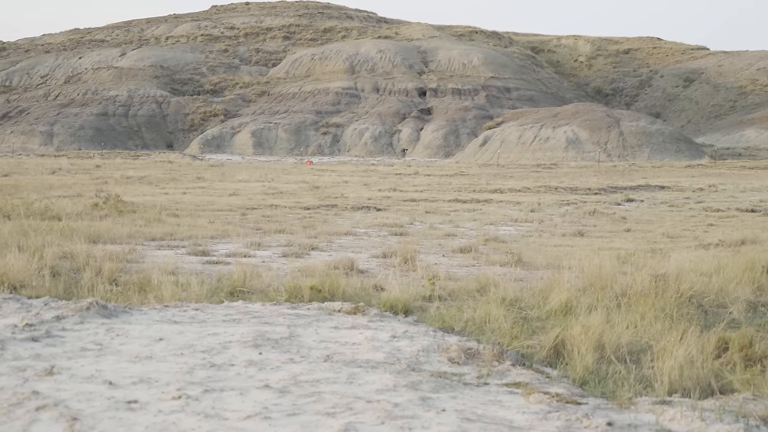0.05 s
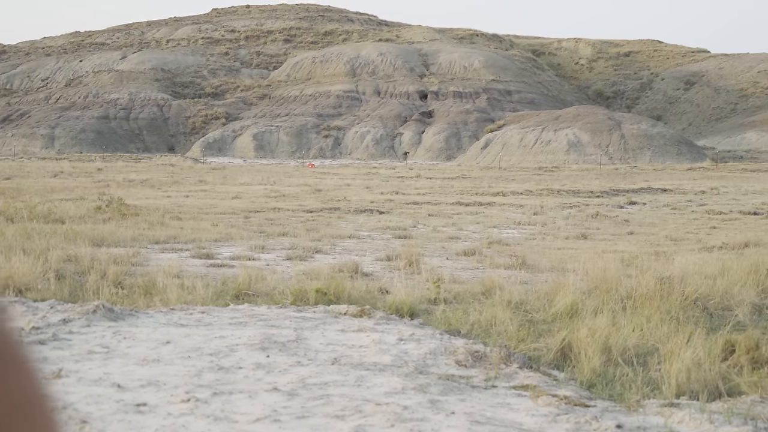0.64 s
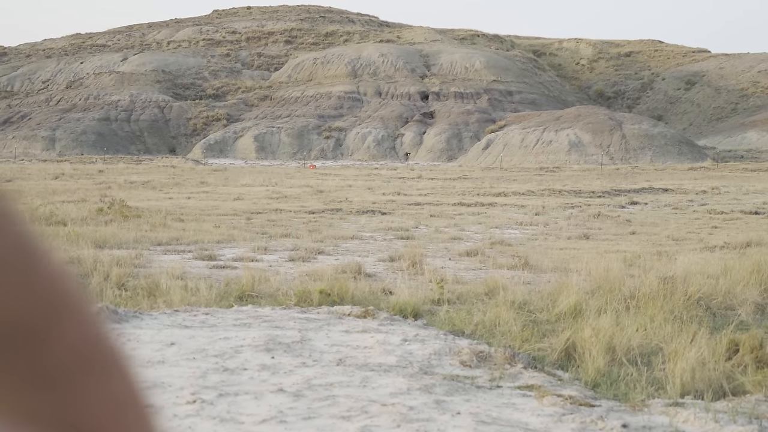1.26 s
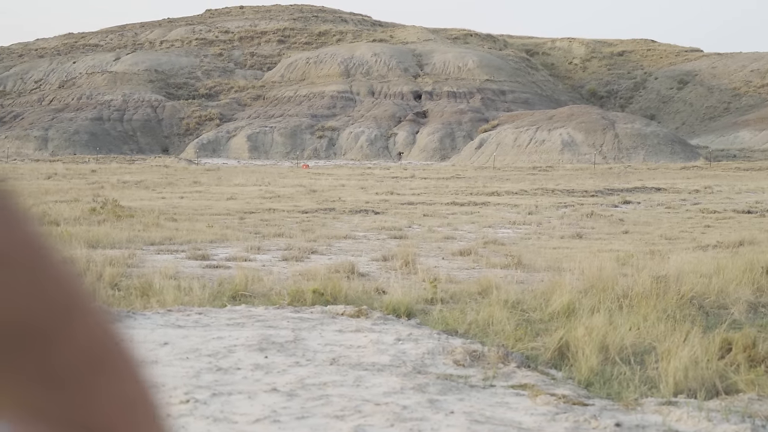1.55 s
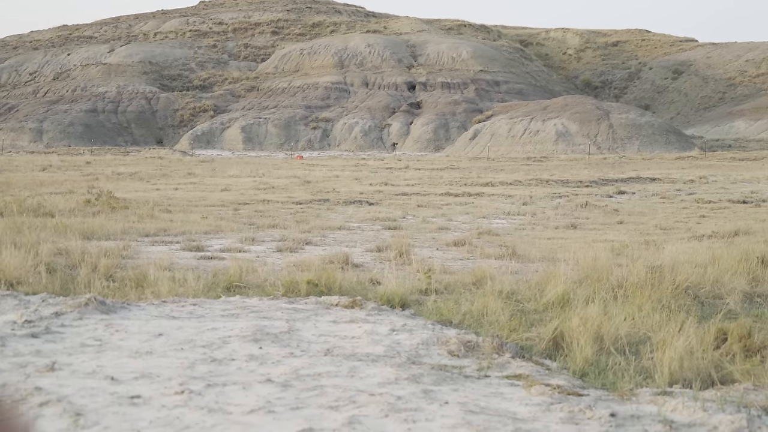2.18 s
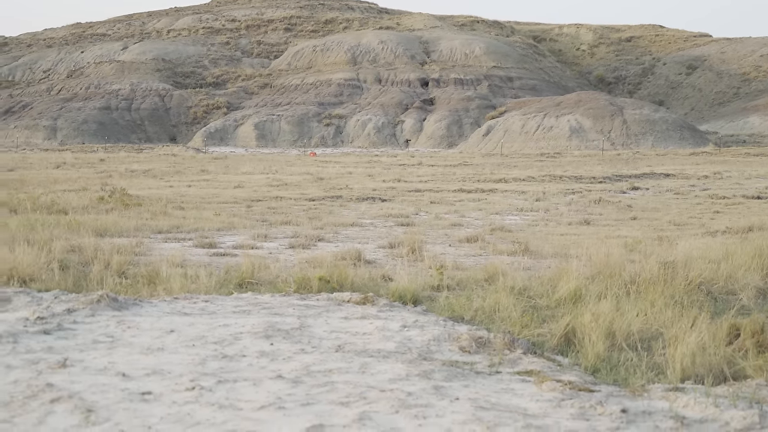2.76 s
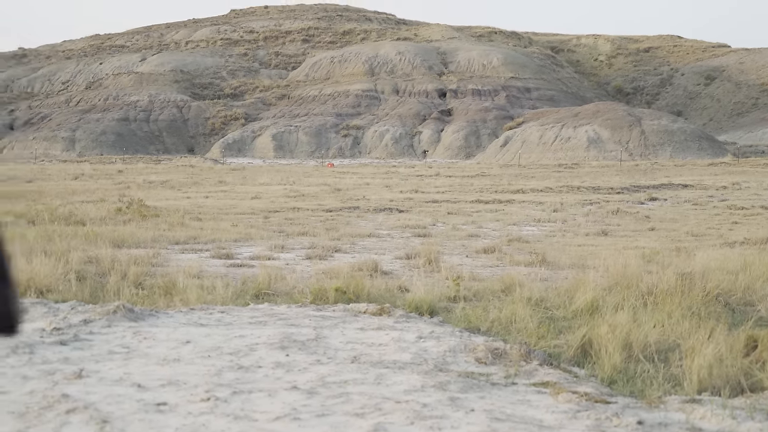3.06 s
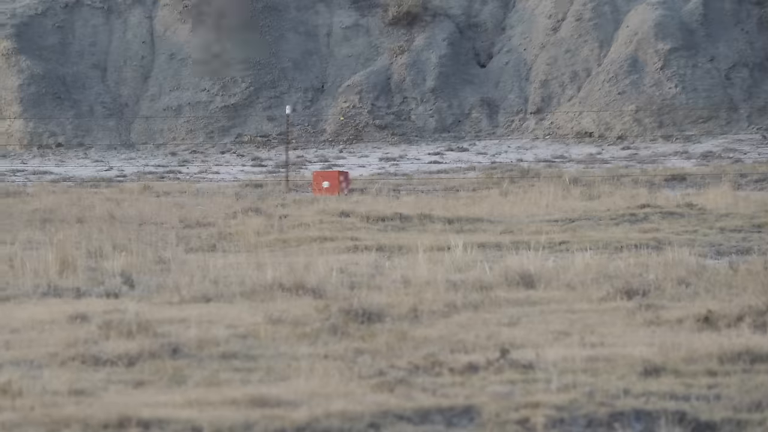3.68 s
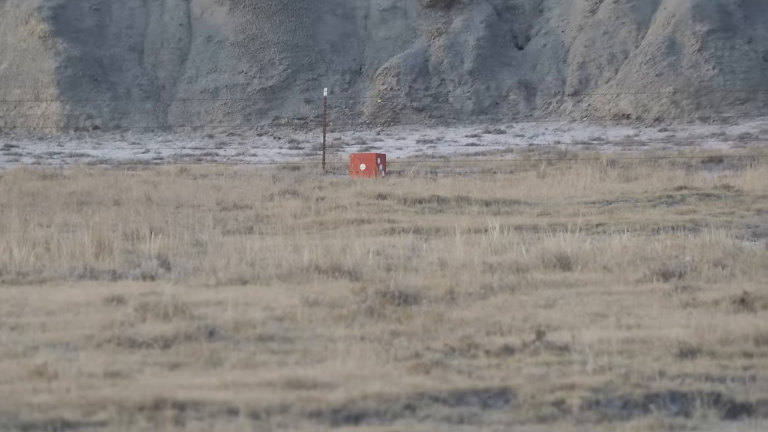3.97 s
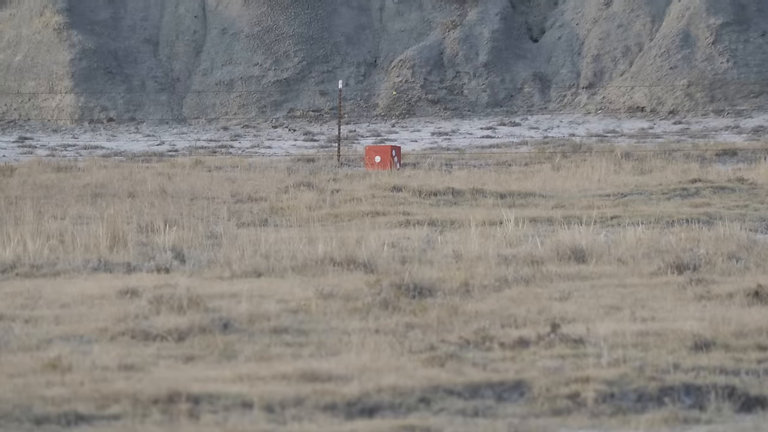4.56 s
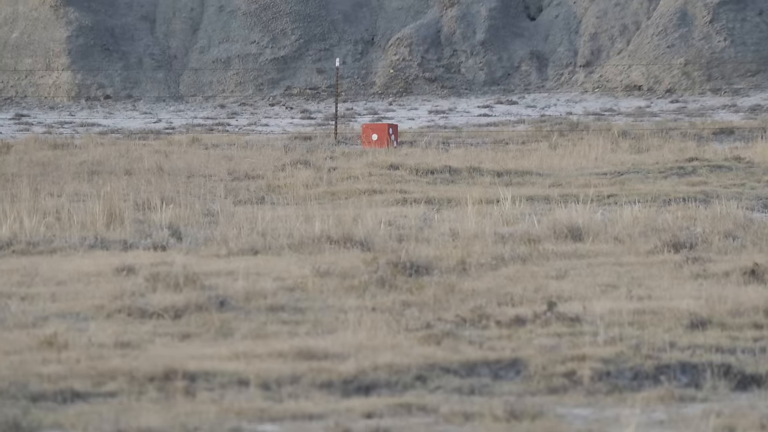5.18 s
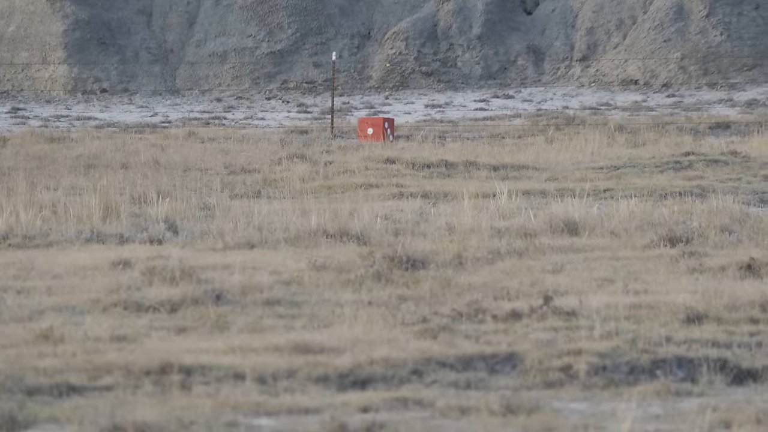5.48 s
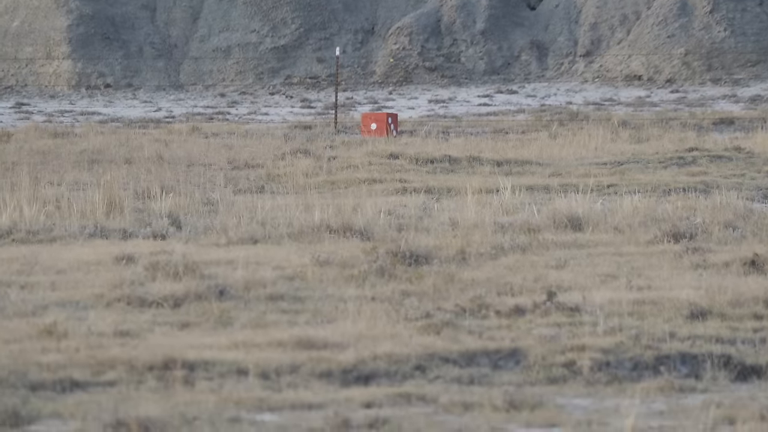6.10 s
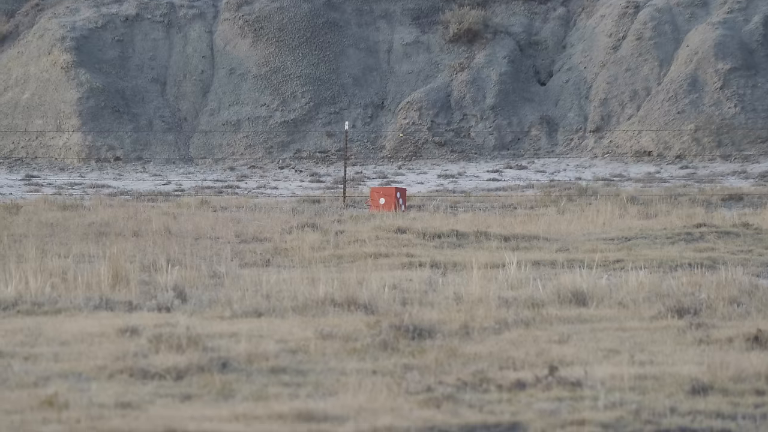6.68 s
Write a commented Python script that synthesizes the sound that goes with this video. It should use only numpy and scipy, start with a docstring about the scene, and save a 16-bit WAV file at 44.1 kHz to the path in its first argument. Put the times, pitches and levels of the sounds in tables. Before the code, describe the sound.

A compound bow fires twice up close with sharp snaps, amid jacket rustle and metallic clinks, over faint crickets and wind on the microphone.

```python
"""A compound bow is shot twice, right beside the microphone, on open grassland.
The release snaps, the string zips home against its stop and the limbs shudder as the arrow leaves.
Arrow and fittings clink and the hand knocks on the grip; a jacket rustles through each draw.
Behind the archer crickets chirp, dry grass ticks and wind buffets the microphone."""
import sys
import numpy as np
from scipy.fft import rfft, irfft, next_fast_len
from scipy.io import wavfile
from scipy.ndimage import map_coordinates

SR = 44100
rng = np.random.default_rng(int(sys.argv[2]) if len(sys.argv) > 2 else 0)


def file_out(sig):
    """Save sig as 16-bit WAV at sys.argv[1]."""
    # one column per channel
    cols = np.atleast_2d(sig).T
    # limit, then scale
    lim = np.clip(cols, -1, 1)
    pcm = np.round(lim * 32767).astype(np.int16)
    wavfile.write(sys.argv[1], SR, pcm)


N = 306054

# Shots: release_s, stop_s, level_db
SHOTS = [(4.167, 4.193, -1), (6.6456, 6.6708, -1)]
# Release hook modes: freq_hz, level_db, t60_s
HOOK_MODES = [(3124, -2, 0.0095), (3398, -4.5, 0.0042), (3992, -9, .0085), (5500, -15, .015),
              (6790, -20, 0.019), (7503, -6, 0.013), (9330, -15, 0.022), (12200, -17, 0.015)]
def release(snap_db=3, rebound_db=2, rebound_s=0.0033, crack_db=3, crack_t60_s=0.0057):
    """The release hook flies open and hits its end stop a moment later."""
    out, t = np.zeros(N), clock()[:SR // 8]
    for release_s, _, level_db in SHOTS:
        for delay_s, blow_db in ((0, snap_db), (rebound_s, rebound_db)):
            crack = amp(crack_db - 60 * t / crack_t60_s) * rng.standard_normal(len(t))
            add(out, release_s + delay_s, amp(level_db + blow_db) * (ring(HOOK_MODES, t) + crack))
    return out


ZIP_RISE_S, ZIP_HOLD_S, ZIP_FALL_S = 0.0034, 0.0044, 0.0016
def string_zip(gain_db=-1, stop_hz=4350, climb_octaves_per_s=190, rough_rad=0.55):
    """The string drives the arrow ever faster: a rough tone climbs into the stop."""
    out, t = np.zeros(N), clock()[:SR // 40] - 1 / 60  # t = 0 at the stop
    pitch_hz = stop_hz * 2 ** (climb_octaves_per_s * np.minimum(t, ZIP_FALL_S))
    shape = envelope(t + ZIP_HOLD_S - ZIP_FALL_S / 2, ZIP_RISE_S, ZIP_HOLD_S, ZIP_FALL_S)
    for _, stop_s, level_db in SHOTS:
        tone = np.sin(2 * np.pi * np.cumsum(pitch_hz) / SR + rough_rad * wobble(1830)[:len(t)])
        add(out, stop_s + t[0], amp(level_db + gain_db) * shape * tone)
    return out


# String stop crack: freq_hz, density_db
CRACK_SPECTRUM = [(60, 10), (250, 9), (700, 6.5), (2000, -3), (4500, 2), (8000, 7), (10500, 1.5),
                  (14000, 4), (16000, -9)]
# Riser and limb modes: freq_hz, level_db, t60_s
RISER_MODES = [(1310, -11, 0.096), (1490, -4, 0.12), (1700, -10, 0.19), (2080, -8, 0.054),
               (1000, -7, 0.088)]
def string_stop(crack_db=2, crack_t60_s=0.024, swell_s=0.0012, riser_db=-13):
    """The string slams home and rings the riser."""
    out, t = np.zeros(N), clock()[:SR // 4]
    attack = 1 - np.exp(-t / swell_s)
    for _, stop_s, level_db in SHOTS:
        crack = amp(crack_db - 60 * t / crack_t60_s) * noise(CRACK_SPECTRUM)[:len(t)]
        riser = amp(riser_db) * ring(RISER_MODES, t)
        add(out, stop_s - swell_s, amp(level_db) * attack * (crack + riser))
    return out


# Limb and cable resonances: centre_hz, width_hz, level_db
LIMB_RESONANCES = [(178, 38, -5), (311, 28, 0.5), (454, 30, 0.5), (646, 140, -4.5), (1440, 840, -17.5)]
# Fletching hiss: freq_hz, density_db
FLETCHING_SPECTRUM = [(500, -10), (1400, 1), (2300, -0.5), (3500, 1), (6000, -2.5), (8300, -1),
                      (10200, -8.5), (11800, -7), (14000, -12), (16000, -15)]
def follow_through(shudder_db=-18, rush_db=-23, launch_db=-14, swing_hz=68, swing_depth=0.22):
    """The arrow hisses off the rest; limbs and cables shudder while the fletching rushes away."""
    out = np.zeros(N)
    for release_s, stop_s, level_db in SHOTS:
        t = clock(release_s)
        shudder = amp(shudder_db) * envelope(t - 0.077, rise_s=0.078, hold_s=0.017, fall_s=0.11)
        rush = amp(rush_db) * envelope(t - 0.084, rise_s=0.044, hold_s=0.007, fall_s=0.14)
        launch = amp(launch_db) * envelope(clock(stop_s - ZIP_HOLD_S), 0.016, 0, 0.048)
        string_swing = 1 + swing_depth * np.cos(2 * np.pi * swing_hz * t)
        travel = np.clip(t / (stop_s - release_s), 0, 1)
        limbs = shudder * string_swing * resonant_noise(LIMB_RESONANCES)
        arrow = np.hypot(rush, launch) * noise(FLETCHING_SPECTRUM, grain_db=14)
        out += amp(level_db) * travel * (limbs + arrow)
    return out


# Metal contacts of arrow and fittings: start_s, level_db, low_band_db, high_band_db, length_ratio
CLINKS = [(2.609, -0.5, -7.5, -4.5, .55), (3.427, -12.5, -29, -18, .55), (3.443, -7, -8, -10, .75),
          (4.332, -13, 1, -4, 0.39), (4.354, -19.5, 0, -1, 0.78), (4.614, -30, 2, -9, 0.38),
          (4.655, -18, -7, -9, .6), (4.664, -14.5, -3, -7, 0.55), (4.681, -23, 7, -5, .4),
          (4.686, -15.5, 1.5, -1, .5), (4.709, -26, -6, -6, .5), (4.716, -17.5, -3, -6, 0.56),
          (4.7866, -8.5, -2.5, -6, .25), (4.7989, -11, 4, -6, 0.27), (4.868, -24.5, -6, -6, 0.61),
          (4.893, -27, -3, -5, .4), (4.96, -34, -16, -18, 0.27), (4.999, -22.5, -5, -7, .6),
          (5.0239, -1, -4, 1, 0.71), (5.03, -7.5, -14, 2, 0.46), (5.073, -11.5, -7, -7, .5),
          (5.091, -25, -10, -10, 0.58), (5.123, -20.5, -6, -6, 0.79), (5.2001, -4.5, 1.5, -3, .8),
          (6.2255, -12, -2.5, -8, 0.83), (6.348, -23.5, -3, -10, .6), (6.81, -16.5, 3, -2.5, 0.76),
          (6.837, -20, 0, 0, .6), (6.846, -24, -5, 2, .5), (6.874, -3.5, 9.5, -4.5, .55),
          (6.882, -22, -5, 6, .4), (6.888, -17, 8, -5, .4)]
# Fitting modes: freq_hz, level_db, t60_s
FITTING_MODES = [(2975, -6.5, 0.029), (3945, -16, 0.1), (5480, -7, 0.059), (6730, -10.5, 0.046),
                 (7350, -8, 0.065), (7820, -7.5, 0.033), (8710, -1.5, 0.044), (9180, -1, 0.021),
                 (9300, -17.5, 0.14), (10150, -13, .04), (11760, -9.5, .03), (12500, -2.5, 0.027),
                 (13100, -14, 0.017), (13920, -1.5, 0.025)]
def clinks(gain_db=1, crack_db=1, crack_t60_s=0.043, bounce_s=0.003, bounce_db=-6, detune=0.012):
    """Each contact strikes three times; the grip damps and detunes the fittings anew."""
    out, t = np.zeros(N), clock()[:SR // 8]
    colour_hz = [500, 2200, 2900, 5700, 7000, 9400, 10800]
    for start_s, level_db, low_db, high_db, length_ratio in CLINKS:
        modes = [(hz * rng.normal(1, detune), db, t60 * length_ratio) for hz, db, t60 in FITTING_MODES]
        hit = amp(crack_db - 60 * t / (crack_t60_s * length_ratio)) * rng.standard_normal(len(t))
        for k in range(3):
            lag = round(k * bounce_s * length_ratio * rng.uniform(0.56, 2) * SR)
            hit[lag:] += amp(k * bounce_db) * ring(modes, t, scatter_db=3.5)[:len(t) - lag]
        colour_db = [low_db - 14, low_db - 9, low_db, low_db, 0, 0, high_db]
        hit = filtered(hit, lambda hz: amp(np.interp(hz, colour_hz, colour_db)))
        add(out, start_s, amp(level_db + gain_db) * hit / np.abs(hit).max())
    return out


# Hand knocks on the bow: start_s, level_db, pitch_hz, slap_db
KNOCKS = [(3.197, -20, 201.4, -10), (3.358, -1.5, 740, -5), (3.373, -2, 219.3, 3), (4.692, -30, 357, 5),
          (4.829, -11, 574, -2.5), (4.835, -25, 350, 15), (4.984, -23, 356, 6), (4.992, -22.5, 331, -6),
          (5.5308, -3, 530, 15), (5.5363, -15, 256, -15), (5.731, -19, 449, -3), (6.274, -17, 602, 4.5),
          (6.307, -16, 505, 3), (6.344, -13.5, 850, -6)]
def knocks(grip_t60_s=0.0092, slap_t60_s=0.0019, slap_hz=1250, rub_db=-19, rub_t60_s=0.036):
    """The hand gives one quick push and rubs briefly; the damped grip swings a few cycles."""
    out, t = np.zeros(N), clock()[:SR // 10]
    friction = noise(FOLD_SPECTRUM)
    for k, (start_s, level_db, pitch_hz, slap_db) in enumerate(KNOCKS):
        slap = amp(slap_db - 60 * t / slap_t60_s) * np.sin(2 * np.pi * slap_hz * t)
        hit = slap + amp(-60 * t / grip_t60_s) * np.sin(2 * np.pi * pitch_hz * t)
        rub = amp(rub_db - 60 * t / rub_t60_s) * friction[k * len(t):][:len(t)]
        add(out, start_s, amp(level_db) * (hit / np.abs(hit).max() + rub))
    return out


# Jacket slides: start_s, hold_s, rise_s, fall_s, fold_db, swish_db, hollow_hz, pocket_re_fold_db
SLIDES = [(2.067, .15, 0.39, .2, -43.5, -50, 750, -0.5), (2.27, 0.067, 0.22, 0.13, -39.5, -45, 780, -0.5),
          (2.396, .045, 0.026, 0.11, -32.5, -34.5, 752, 0), (2.545, .19, .075, 0.045, -26, -28, 1000, -3),
          (2.776, 0.32, 0.14, 0.056, -37.5, -37.5, 1000, -20),
          (2.893, 0.082, 0.16, 0.2, -25, -30.5, 862, -20), (3.15, 0.034, .13, 0.021, -26, -32.5, 1000, -33),
          (3.274, 0.067, 0.12, 0.12, -21, -26.5, 1148, -20),
          (5.35, .125, .02, 0.069, -36.5, -40, 1000, -23), (5.56, .04, 0.065, 0.077, -43.5, -50, 699, -12),
          (5.697, 0.0596, 0.13, .12, -33.5, -37.5, 713.6, -18),
          (5.86, 0.014, 0.069, .16, -29, -33, 795, -14), (5.989, 0.085, 0.13, .2, -31.5, -32.5, 798, -9),
          (6.199, 0.11, 0.21, 0.067, -35.5, -37.5, 790, -12)]
# Quick sleeve brushes: centre_s, fold_db, scrape_db, sigma_s
BRUSHES = [(2.572, -32.5, -28.5, 0.044), (2.726, -25.5, -25.5, 0.0073), (2.962, -30, -27.5, 0.019),
           (3.169, -32, -26.5, 0.014), (3.282, -40, -23, 0.016), (3.334, -23.5, -24, 0.014),
           (4.447, -44.5, -53, 0.0067), (4.692, -43, -44, .0073), (4.722, -63, -46, 0.15),
           (5.096, -50, -46, 0.13), (5.294, -40, -66, 0.0055), (5.341, -30.5, -43, 0.0013),
           (5.39, -33, -36.5, 0.0083), (5.454, -29.5, -37, 0.0073), (5.734, -20, -29, 0.0087),
           (6.072, -30, -26, .015), (6.31, -29.5, -45, 0.0072)]
# Flapping folds: freq_hz, density_db
FOLD_SPECTRUM = [(80, -18), (170, -5), (300, 1), (400, -2.5), (600, 3.5), (950, 2.5), (1400, -1.5),
                 (2000, -8), (4000, -51.5), (9000, -66)]
# Sliding weave: freq_hz, density_db
SWISH_SPECTRUM = [(600, -16), (1700, 4.5), (3000, -0.5), (4200, 0), (6000, -0.5), (8600, 0), (10500, -10.5),
                  (12000, -11.5), (14500, -8), (16000, -26)]
# Fast, brighter scrape: freq_hz, density_db
SCRAPE_SPECTRUM = [(600, -5), (1700, 2), (3200, 2.5), (5000, 1), (8500, 6), (10300, -3.5), (11800, -7),
                   (14500, -3), (16000, -18)]
def jacket(fold_gain_db=-2, hollow_db=-2, crease_db=-5, rasp_db=-6, rasp_hz=2850, pocket_hz=360):
    """Cloth slides on cloth: folds flap around a hollow, creases pop, the weave rasps and catches."""
    fold, swish, pocket, flap, scrape = np.zeros((5, N))
    for start_s, hold_s, rise_s, fall_s, fold_db, swish_db, _, pocket_db in SLIDES:
        slide = envelope(clock(start_s), rise_s, hold_s, fall_s)
        fold = np.hypot(fold, amp(fold_gain_db + fold_db) * slide)
        swish = np.hypot(swish, amp(swish_db) * slide)
        pocket = np.hypot(pocket, amp(fold_gain_db + fold_db + pocket_db) * slide)
    for centre_s, fold_db, scrape_db, sigma_s in BRUSHES:
        stroke = np.exp(-0.5 * np.linspace(-4, 4, round(8 * sigma_s * SR)) ** 2)
        start_s = centre_s - len(stroke) / SR / 2
        add(flap, start_s, amp(fold_db) * stroke)
        add(scrape, start_s, amp(scrape_db) * stroke)
    starts_s, holds_s, *_, hollows_hz, _ = np.transpose(SLIDES)
    hollow_hz = np.interp(clock(), starts_s + holds_s / 2, hollows_hz) * np.exp(0.13 * wobble(18))
    pressure = (fold / fold.max()) ** 0.5  # harder rubbing brings out the hollow
    hollow = amp(hollow_db) * pressure * band(hollow_hz, width_hz=400)
    rasp = amp(rasp_db) * band(rasp_hz * np.exp(0.15 * wobble(16)), width_hz=900)
    cloth = noise(FOLD_SPECTRUM, grain_db=8) + hollow + amp(crease_db) * creases()
    folds = np.hypot(fold, flap) * cloth
    folds += pocket * band(pocket_hz * np.exp(0.13 * wobble(12)), width_hz=280)
    weave = swish * (noise(SWISH_SPECTRUM, grain_db=7.5) + rasp)
    weave += scrape * noise(SCRAPE_SPECTRUM, grain_db=11.5)
    catching = amp(1.32 * wobble(110))
    return catching * (folds + weave)


def creases(rate_per_s=170, centre_hz=1000, log_spread=0.6, t60_cycles=16):
    """Small creases buckle at random, each a short hollow pop; rms 1."""
    when, pitch, strength = rng.random((round(rate_per_s * N / SR), 3)).T[:, :, None]
    pitch_hz = centre_hz * np.exp(log_spread * np.sqrt(3) * (2 * pitch - 1))
    samples = np.arange(600)
    cycles = pitch_hz * samples / SR
    pops = -np.log(1 - strength) * np.sin(2 * np.pi * cycles) * amp(-60 * cycles / t60_cycles)
    positions = (when * N).astype(int) + samples
    return unit(np.bincount(positions.ravel(), pops.ravel(), N)[:N])


# Arm scuffs: start_s, hold_s, level_db
SCUFFS = [(3.365, 0.033, -20.5), (3.408, 0.068, -26), (6.273, 0.13, -43.5)]
# Hollow scuff resonances: centre_hz, width_hz, level_db
SCUFF_RESONANCES = [(162, 52, 0), (285, 82, -1), (600, 125, -8.5), (810, 106, -2.5), (1310, 170, -26)]
def scuff(rise_s=0.0094, fall_s=0.023):
    """The arm settles at full draw with a dull, hollow rub."""
    rubbing = sum(amp(level_db) * envelope(clock(start_s), rise_s, hold_s, fall_s)
                  for start_s, hold_s, level_db in SCUFFS)
    return rubbing * resonant_noise(SCUFF_RESONANCES)


# Squeak resonances: centre_hz, width_hz, level_db
SQUEAK_RESONANCES = [(1410, 240, -12), (2644, 390, -11), (4020, 250, 0), (8000, 980, -21), (9490, 500, -20),
                     (13400, 600, -23)]
def squeak(start_s=1.887, gain_db=-24.5, start_hz=1010, end_hz=1390, glide_s=0.0043, rise_s=0.0025):
    """Stick-slip speeds up, and its overtones sweep through the resonances."""
    out, t = np.zeros(N), clock(2 * rise_s)[:SR // 25]
    slip_hz = end_hz + (start_hz - end_hz) * np.exp(-(np.maximum(t, 0) / glide_s) ** 2)
    harmonics = np.arange(1, 12)[:, None]
    partials = np.exp(2j * np.pi * harmonics * np.cumsum(slip_hz) / SR)
    tone = np.sum(body(SQUEAK_RESONANCES, harmonics * slip_hz) * partials, axis=0).real
    add(out, start_s + t[0], amp(gain_db) * envelope(t, rise_s, hold_s=0.0053, fall_s=0.019) * tone)
    return out


SYLLABLE_S, SYLLABLE_PERIOD_S = 0.035, 0.05
# Nearest cricket's chirps: first_syllable_s, level_db, syllable_count
CHIRPS = [(.021, -41, 3), (.239, -44, 3), (.556, -38, 3), (1.025, -38, 3), (1.433, -38.5, 3),
          (1.680, -46.5, 4), (1.94, -36.5, 3), (3.418, -38, 3), (3.865, -37.5, 3), (4.295, -37.5, 3),
          (4.5, -47, 3), (4.972, -40, 2), (5.375, -37, 3), (5.918, -37, 2), (6.431, -41, 4)]
def near_cricket(pitch_hz=4790, first_db=-4):
    """A cricket chirps in short groups of wing strokes, the first one softer."""
    out = np.zeros(N)
    for first_s, level_db, syllable_count in CHIRPS:
        for k in range(round(syllable_count)):
            stroke = syllable(pitch_hz * rng.normal(1, 0.0094), SYLLABLE_S * rng.uniform(0.73, 1.19))
            gain = amp(level_db + first_db * (k == 0) + rng.normal())
            add(out, first_s + k * SYLLABLE_PERIOD_S - SYLLABLE_S / 2, gain * stroke)
    return out


# Higher trills: start_s, end_s, pitch_hz, level_db
TRILLS = [(1.4, 3, 7200, -59), (2.6, 6.94, 7330, -51.5), (.08, 1.9, 6650, -58), (.02, 1.1, 8450, -59),
          (1.6, 2.5, 8700, -66)]
def trilling_crickets(period_s=0.0787):
    """Other crickets stroke their wings in long, even runs."""
    out = np.zeros(N)
    for start_s, end_s, pitch_hz, level_db in TRILLS:
        stroke = syllable(pitch_hz, SYLLABLE_S, droop=0.078)
        for centre_s in np.arange(start_s, end_s, period_s):
            add(out, centre_s - SYLLABLE_S / 2, amp(level_db + rng.normal()) * stroke)
    return out


def far_crickets(level_db=-52, pitch_hz=4730, period_s=0.39, count=3):
    """Far neighbours take turns with four-stroke chirps, each at its own pitch and pace."""
    out = np.zeros(N)
    for neighbour, (pitch, pace) in enumerate(rng.uniform(-1.1, 1, (count, 2))):
        stroke = syllable(pitch_hz * (1 + 0.0287 * pitch), SYLLABLE_S)
        for start_s in np.arange(neighbour / count * period_s, N / SR, period_s * (1 + 0.022 * pace)):
            for k, stroke_db in enumerate(rng.normal(level_db, 2.5, 4)):
                add(out, start_s + k * SYLLABLE_PERIOD_S, amp(stroke_db) * stroke)
    return out


def syllable(pitch_hz, length_s, droop=0.122):
    """One wing stroke: the file slows, so the tone sags."""
    progress = np.arange(round(length_s * SR)) / (length_s * SR)
    phase = 2 * np.pi * np.cumsum(pitch_hz * (1 - droop * progress ** 2)) / SR
    return np.sin(np.pi * progress) ** 2 * np.sin(phase)


# Gusts on the microphone: start_s, hold_s, buffet_db, flutter_db
GUSTS = [(1.633, 0.057, -23.5, -47), (2.567, 0.022, -24, -35), (2.746, 0.61, -24.5, -48),
         (3.277, 0.21, -17.5, -36.5), (3.786, 0.057, -12, -31), (4.065, 0.21, -18.5, -35),
         (4.43, 0.14, -13, -33.5), (4.636, 0.24, -16.5, -35.5), (4.966, 0.084, -38, -41),
         (5.285, 0.023, -32, -41), (6.29, 0.19, -17.5, -31.5), (6.532, .06, -16, -29),
         (6.75, 0.24, -21, -28.5)]
# Slow eddies: freq_hz, density_db
BUFFET_SPECTRUM = [(3, -6), (10, 3), (20, -1), (33, -10), (52, -13.5), (80, -26.5), (160, -43), (400, -120)]
# Quicker flutter: freq_hz, density_db
FLUTTER_SPECTRUM = [(25, -41), (55, 0), (80, -3), (120, -5), (170, -12), (250, -20.5), (500, -37),
                    (2000, -74)]
# Open air: freq_hz, density_db
AIR_SPECTRUM = [(60, 7), (300, 3.5), (600, 1.5), (1000, -4), (2000, -7.5), (3700, -11), (5000, -6),
                (6200, -12.5), (10000, -14.5), (16000, -16)]
def wind(steady_buffet_db=-27, steady_flutter_db=-44, air_db=-50, grass_db=-50, grass_fall_s=0.74):
    """Gusts on a steady breeze buffet the microphone; a stir in the grass dies away."""
    buffet, flutter = amp(steady_buffet_db), amp(steady_flutter_db)
    for start_s, hold_s, buffet_db, flutter_db in GUSTS:
        gust = envelope(clock(start_s), rise_s=0.12, hold_s=hold_s, fall_s=0.25)
        buffet = np.hypot(buffet, amp(buffet_db) * gust)
        flutter = np.hypot(flutter, amp(flutter_db) * gust)
    air = amp(air_db + 0.11 * wobble(3.92)) * noise(AIR_SPECTRUM)
    grass = amp(grass_db - 20 * clock() / grass_fall_s) * noise(FOLD_SPECTRUM)
    return buffet * noise(BUFFET_SPECTRUM) + flutter * noise(FLUTTER_SPECTRUM) + air + grass


# Ticks in the grass: start_s, level_db
TICKS = [(0.1238, -31), (0.3627, -33), (1.0013, -26.5), (1.347, -35), (1.942, -33), (2.05, -30),
         (2.069, -28)]
# Dry stalks: freq_hz, density_db
STALK_SPECTRUM = [(400, 7), (1500, 1.5), (3500, -0.5), (6000, -10), (14000, -35)]
def grass_ticks(gain_db=-5, t60_s=0.022):
    """Dry stalks tick faintly."""
    bursts, t = np.zeros(N), clock()[:SR // 20]
    for start_s, level_db in TICKS:
        add(bursts, start_s, amp(level_db + gain_db - 60 * t / t60_s))
    return bursts * noise(STALK_SPECTRUM)


def insect_buzz(peak_s=0.41, level_db=-51.5, centre_hz=7900, width_hz=900):
    """A brief, thin, high buzz, as of an insect or bird."""
    shape = envelope(clock(peak_s), rise_s=0.016, hold_s=0, fall_s=0.3)
    return amp(level_db) * shape * resonant_noise([(centre_hz, width_hz, 0)])


def amp(db):
    """Decibels to gain."""
    return 10 ** (np.asarray(db) / 20)


def unit(x):
    """Scale to rms 1."""
    return x / np.sqrt(np.mean(x ** 2) + 1e-20)


def clock(start_s=0):
    """Seconds since start_s, for every sample."""
    return np.arange(N) / SR - start_s


def envelope(t, rise_s, hold_s, fall_s):
    """Full level from t = 0 for hold_s; rise_s and fall_s each span 20 dB."""
    return amp(-20 * (np.maximum(-t, 0) / rise_s + np.maximum(t - hold_s, 0) / fall_s))


def wobble(knots_per_s):
    """A smooth random curve."""
    knots = rng.standard_normal(int(N * knots_per_s / SR) + 4)
    return map_coordinates(knots, [clock() * knots_per_s])


def filtered(x, response):
    """Apply a frequency response to x."""
    size = next_fast_len(len(x) + 8192)
    return irfft(rfft(x, size) * response(np.fft.rfftfreq(size, 1 / SR)), size)[:len(x)]


def noise(spectrum, grain_db=0):
    """Coloured noise of rms 1; grain_db scatters the sizes of its tiny impulses."""
    freq_hz, db = np.transpose(spectrum)
    grains = rng.standard_normal(N) * amp(grain_db * np.clip(rng.standard_normal(N), -2, 2))
    return unit(filtered(grains, lambda hz: amp(np.interp(np.log(hz + 1), np.log(freq_hz + 1), db))))


def band(centre_hz, width_hz):
    """Narrow noise around a moving centre."""
    phase = 2 * np.pi * np.cumsum(centre_hz) / SR
    return wobble(width_hz) * np.cos(phase) + wobble(width_hz) * np.sin(phase)


def ring(modes, t, scatter_db=2):
    """Damped modes, struck at new strengths each time."""
    return sum(amp(db + scatter_db * rng.standard_normal() - 60 * t / t60_s)
               * np.sin(2 * np.pi * (hz * t + rng.random())) for hz, db, t60_s in modes)


def body(resonances, hz):
    """Complex response of resonances summed with alternating signs."""
    return sum((-1) ** k * amp(db) * 1j * hz * width_hz / (centre_hz ** 2 - hz ** 2 + 1j * hz * width_hz)
               for k, (centre_hz, width_hz, db) in enumerate(resonances))


def resonant_noise(resonances):
    """Resonances shaken at random, rms 1."""
    return unit(filtered(rng.standard_normal(N), lambda hz: body(resonances, hz)))


def add(track, start_s, sound):
    """Mix a sound into the track."""
    start = min(max(round(start_s * SR), 0), N)
    track[start:start + len(sound)] += sound[:N - start]


def scene():
    """Everything sounds dry in the open air; mono."""
    air = wind() + insect_buzz() + grass_ticks()
    archer = jacket() + scuff() + squeak()
    bow = release() + string_zip() + string_stop() + follow_through() + clinks() + knocks()
    crickets = near_cricket() + trilling_crickets() + far_crickets()
    return (bow + archer + crickets + air)[None]


def record(dry):
    """The shots overload the recorder, which keeps nothing above its band limit."""
    limit_hz, taper_hz = 16200, 600
    clipped = dry[0] / (1 + np.abs(dry[0]) ** 8) ** (1 / 8)
    return filtered(clipped, lambda hz: np.clip((limit_hz - hz) / taper_hz, 0, 1) ** 2)[None]


dry = scene()
out = record(dry)
file_out(out)
```